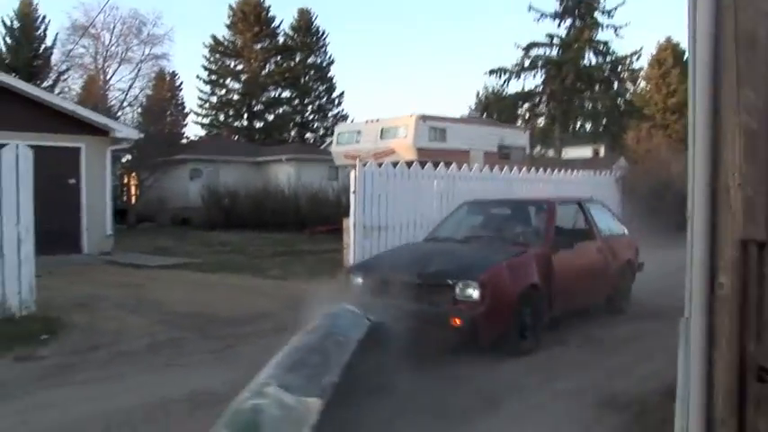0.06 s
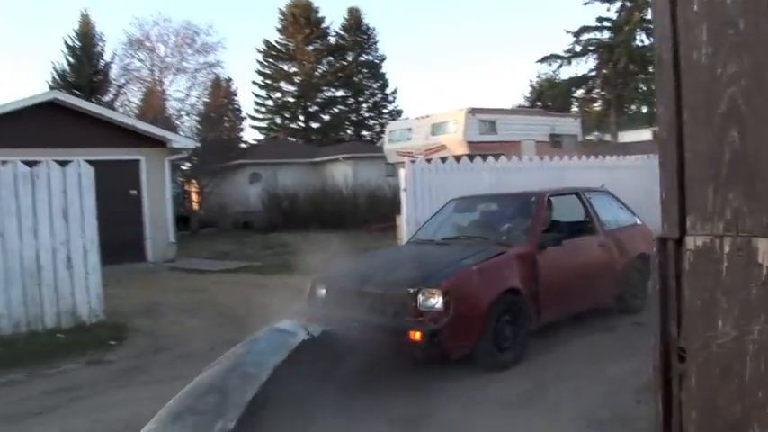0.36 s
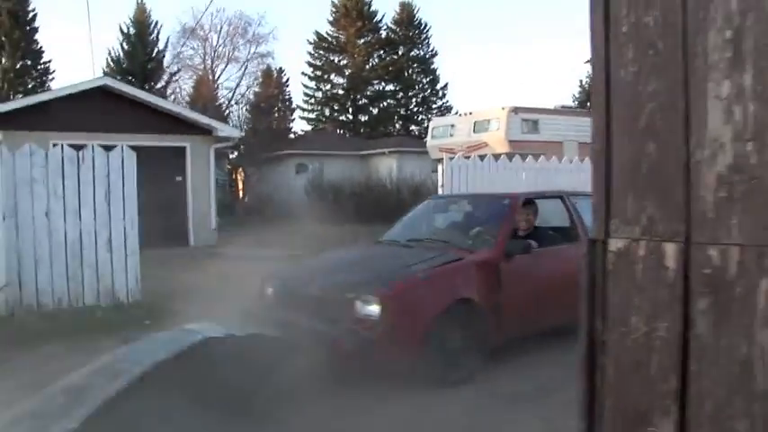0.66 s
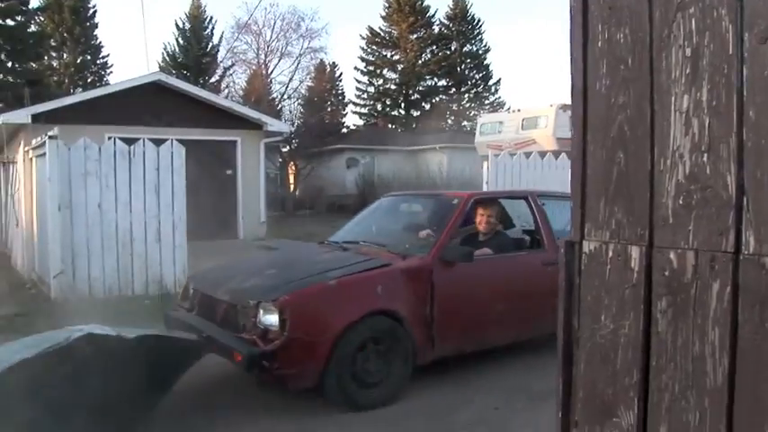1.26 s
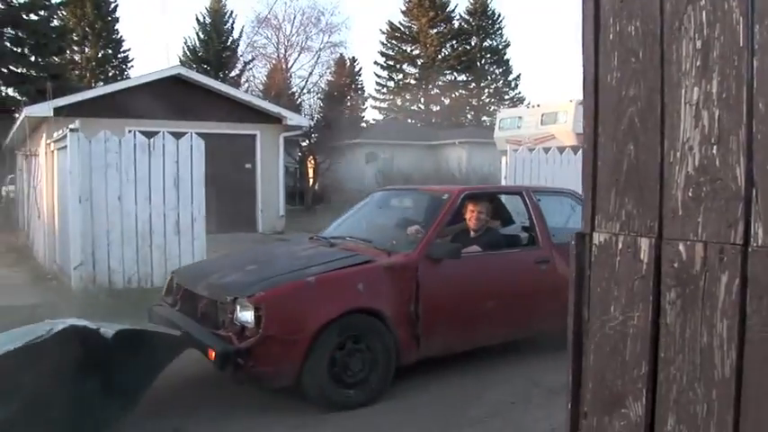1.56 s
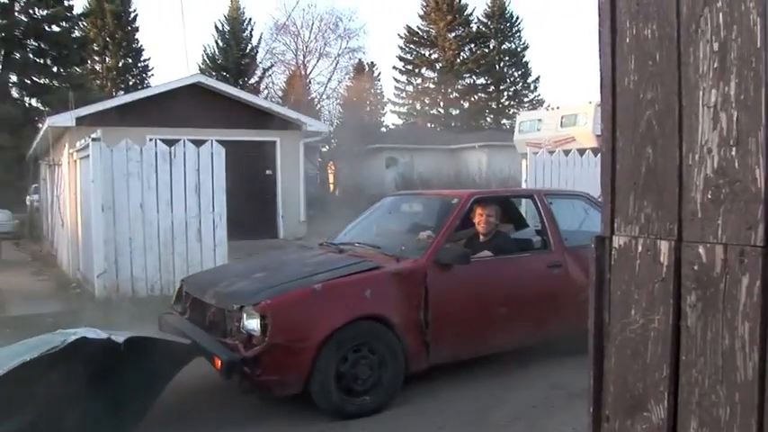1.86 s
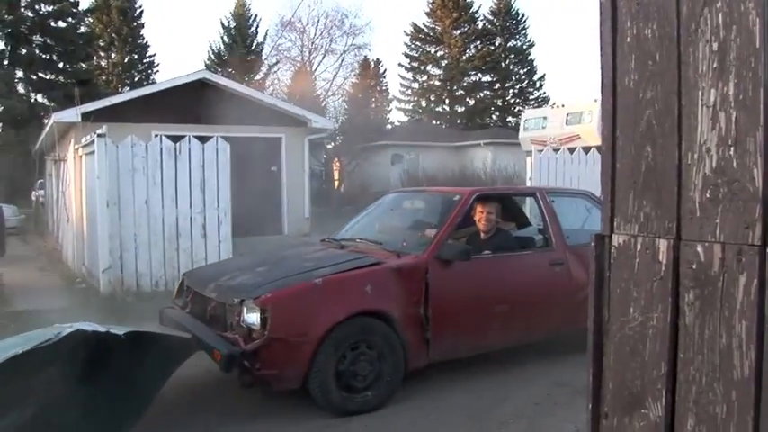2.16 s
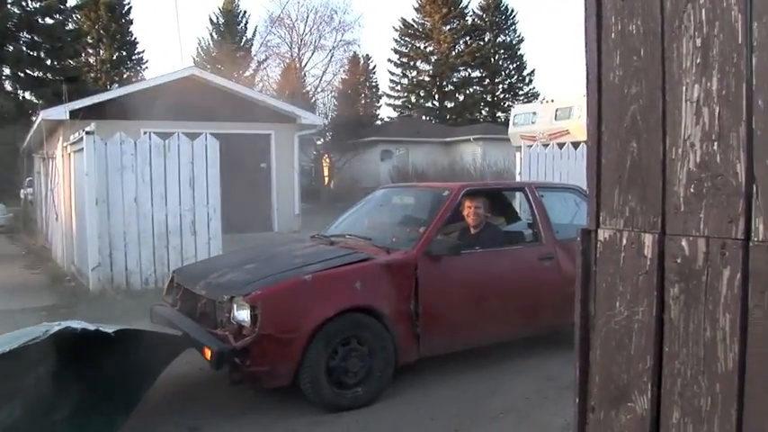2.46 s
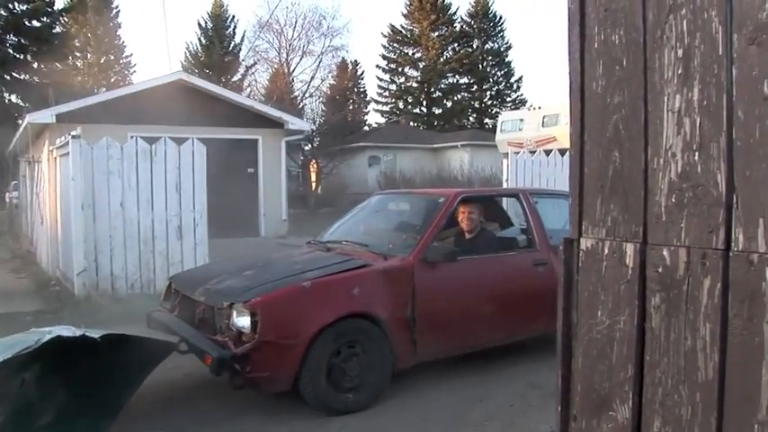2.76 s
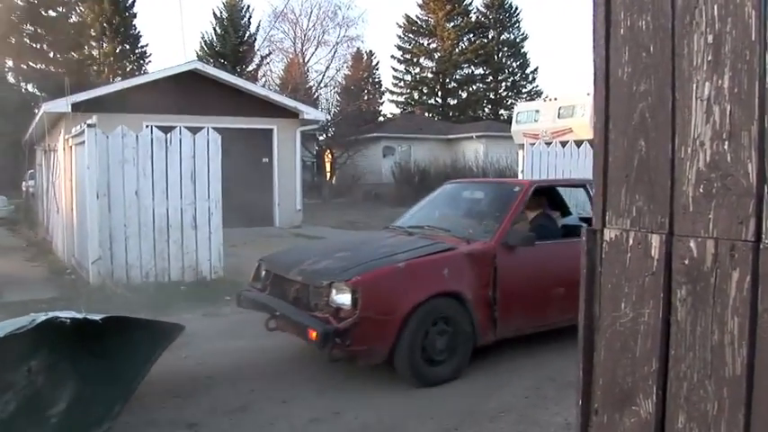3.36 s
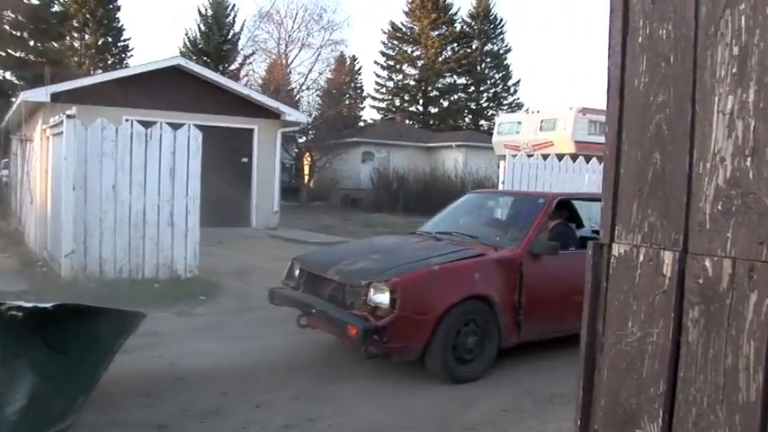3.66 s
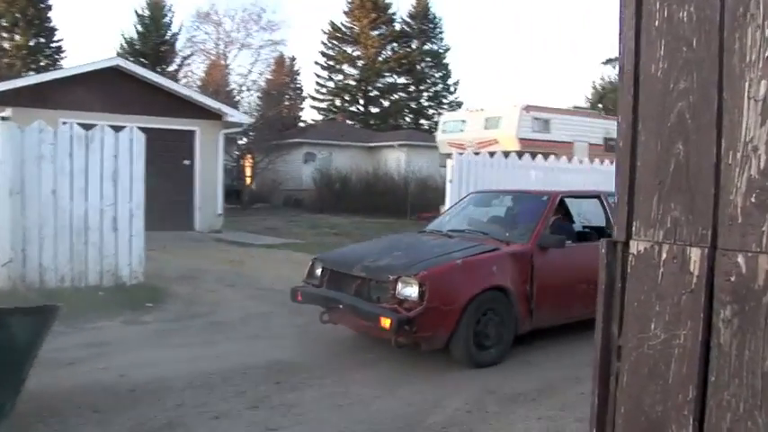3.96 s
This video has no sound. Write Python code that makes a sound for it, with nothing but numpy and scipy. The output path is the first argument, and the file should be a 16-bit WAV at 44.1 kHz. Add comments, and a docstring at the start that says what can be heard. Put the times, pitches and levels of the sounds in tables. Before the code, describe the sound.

A canoe scrapes loudly over gravel a few metres away, slightly left, with crunching, cracking stones and a hollow boom from the hull. After 1 second the scraping turns weaker and jerky, with brief groans, stopping around 2 seconds. A small car engine idles quietly, then revs at about 2.4 seconds with a low, thumping exhaust and light clatter. It sags near 3.3 seconds, picking up slightly while reversing.

```python
"""Gravel crunches and cracks under a booming hull: a small car shoves an upturned canoe along an alley.
The hull sticks and slips, crushing stones that make its shell ring; then it stops and settles.
The engine, whose firings thump the exhaust, idles, is revved, and sags as the clutch bites and backs
the car away. Heard from a few metres through a small stereo microphone."""
import sys
import numpy as np
from scipy import signal
from scipy.fft import rfft, irfft, next_fast_len
from scipy.io import wavfile
from scipy.ndimage import uniform_filter1d

SR = 44100
rng = np.random.default_rng(int(sys.argv[2]) if len(sys.argv) > 2 else 0)


def dump_mix(stems):
    """Bounce the given channels to the path in sys.argv[1] as a 16-bit WAV at rate SR."""
    frames = np.atleast_2d(stems).T  # one column per channel
    limited = np.clip(frames, -1, 1)  # hard clip at full scale
    pcm = np.round(limited * 32767).astype(np.int16)
    wavfile.write(sys.argv[1], SR, pcm)


N = 176400
T = np.arange(N) / SR

# tone of crunching stones: pitch_hz, level_db
CRUNCH_TONE = [(150,-34),(300,1),(420,2),(540,0.5),(740,-0.5),(1000,-0.5),(1210,0),(1500,-1.5),(2000,0),(2480,4.5),(2850,3),(3080,0.5),(3350,-4.5),(4300,-13.5),(4900,-12.5),(5800,-25),(8500,-34),(15500,-30.5)]
# deep tone of the hull, also used for the engine's burble: pitch_hz, level_db
BOOM_TONE = [(25,-57),(55,-23.5),(85,-9),(135,1),(175,-3),(230,-7),(300,-16),(600,-22.5),(2000,-70.5)]
# bright tone of sand and stone chips: pitch_hz, level_db
GRIT_TONE = [(1000,8),(4000,7),(8500,-0.5),(11000,5),(15500,3.5)]


def from_db(db):
    """Turn decibels into a gain."""
    return 10 ** (np.asarray(db) / 20)


def rms_one(x):
    """Scale a sound to an average power of 1."""
    return x / np.sqrt(np.mean(x ** 2) + 1e-20)


def in_time(rows):
    """Draw straight lines between a table's rows: one curve per column after the time."""
    times, *columns = np.transpose(rows)
    return [np.interp(T, times, column) for column in columns]


def colour(x, tone):
    """Filter a sound to follow a tone table, ringing only after each hit (minimum phase)."""
    size = 2 * next_fast_len(N // 2 + SR // 4)
    hz, db = np.transpose(tone)
    grid_hz = np.maximum(np.arange(size // 2 + 1) * SR / size, 1)
    gains = from_db(np.interp(np.log(grid_hz), np.log(hz), db))
    cepstrum = irfft(np.log(gains))
    cepstrum[1:size // 2] *= 2
    cepstrum[size // 2 + 1:] = 0
    return irfft(rfft(x, size) * np.exp(rfft(cepstrum)))[:N]


def drift(rate_hz):
    """A smooth random wander, typically about 1 either side of zero."""
    r = np.exp(-80 * np.pi * rate_hz / SR)
    slow = signal.lfilter([1], [1, -2 * r, r * r], rng.standard_normal(N // 40 + 2002))[2000:]
    return np.interp(np.arange(N) / 40, np.arange(len(slow)), rms_one(slow))


def steady(x, window=5000):
    """Even out slow swings in loudness, holding the power near 1."""
    power = uniform_filter1d(uniform_filter1d(x ** 2, window), window)
    return x / np.sqrt(np.maximum(power, 1e-20))


def grains(per_s, spread_db):
    """Random clicks, many small and a few large."""
    sizes = from_db(spread_db * np.minimum(rng.exponential(1, N), 5))
    return sizes * rng.choice([-1, 1], N) * (rng.random(N) < per_s / SR)


def ring(x, hz, widths_hz):
    """Make a sound ring at one pitch, with one filter for each width."""
    for width_hz in widths_hz:
        r = np.exp(-np.pi * width_hz / SR)
        x = signal.lfilter([1, 0, -1], [1, -2 * r * np.cos(2 * np.pi * hz / SR), r * r], x)
    return x


def hull_scrape():
    """The hull sticks and slips, crushing grains that ring patches of the shell and shake all of it."""
    # crunch of the hull dragging over gravel: time_s, level_db
    drag = [(0.0,-21),(0.04,-15.5),(0.30,-17),(0.44,-19.5),(0.48,-16.5),(0.725,-19.5),(0.77,-17),(0.89,-23),(0.98,-16.5),(1.12,-27.5),(1.31,-22),(1.385,-26.5),(1.46,-20),(1.50,-23),(1.60,-23.5),(1.7,-32.5),(1.75,-21.5),(1.81,-34.5),(1.87,-28.5),(1.95,-57.5)]
    # boom of the juddering hull: time_s, level_db
    judder = [(0.0, -25), (0.16, -24.5), (0.24, -15.5), (0.32, -21), (1.24, -28), (1.28, -38.5),
              (1.39, -24.5), (1.63, -27.5), (2.0, -50)]
    # hiss of sand being sprayed and crushed: time_s, level_db
    spray = [(0,-41),(.99,-40.5),(1.13,-48),(1.59,-41),(1.72,-48),(1.775,-40),(1.8,-54),(1.85,-51),(1.96,-74),(2.08,-59),(2.2,-90)]
    slips = from_db(1.5 * drift(rate_hz=47))
    contacts = grains(per_s=9000, spread_db=3) * slips
    patches, below = 0, 0
    for hz in np.geomspace(350, 5000, 16):  # each band swells and fades on its own
        low = signal.sosfiltfilt(signal.butter(10, hz, fs=SR, output="sos"), contacts)
        patches += (low - below) * from_db(3.5 * drift(rate_hz=9.9))
        below = low
    crunch = steady(colour(patches + contacts - below, CRUNCH_TONE), window=2400)
    crunch *= from_db(in_time(drag)[0] - 1) * np.interp(T, [1.9, 2.05], [1, 0])
    boom = steady(colour(grains(per_s=1500, spread_db=2.26) * slips, BOOM_TONE), window=3500)
    boom *= from_db(in_time(judder)[0] + 1) * np.interp(T, [1.75, 1.92], [1, 0])
    sand = steady(colour(grains(per_s=14000, spread_db=1.5) * slips, GRIT_TONE), window=2400)
    sand *= from_db(in_time(spray)[0] + 4)
    return crunch + boom + sand


def exhaust(pulses, boom_db):
    """Each firing pushes a low thump out of the exhaust."""
    # tone of the exhaust: pitch_hz, level_db
    tone = [(25,-39.5),(44,-12.5),(54,-11),(65,-2.5),(88,-0.5),(110,2.5),(132,5),(165,-9.5),(215,-21.5),(262,-35),(305,-17),(360,-32),(445,-21),(540,-30),(900,-44.5),(3000,-65.5)]
    return -steady(colour(pulses, tone)) * from_db(boom_db - 0.5)


def pipe_ring(firings, pipe_db):
    """Firings of uneven strength ring the exhaust pipe."""
    uneven = firings * from_db(1.5 * rng.standard_normal(N))
    return steady(ring(uneven, hz=200, widths_hz=(41, 90))) * from_db(pipe_db - 2.5)


def panel_growl(pulses, throb, boom_db):
    """The firings ring a body panel, which partly follows the exhaust's loudness."""
    shaking = pulses + 0.012 * rng.standard_normal(N) * (1 + throb)
    return steady(ring(shaking, hz=441, widths_hz=(48, 260))) * from_db(0.72 * boom_db - 31)


def fan(firing_count, firing_hz):
    """The fan hums where its housing rings; the octave above whines as it passes a second resonance."""
    blades_per_firing = 8
    phase = 2 * np.pi * blades_per_firing * firing_count
    blade_hz = blades_per_firing * firing_hz
    hum = np.sin(phase) * from_db(-42 + drift(rate_hz=5.1))
    hum /= np.hypot(1, (blade_hz - 217) / 12)  # loudest at 217 Hz
    whine = np.sin(2 * phase) * from_db(-50.5)
    whine /= np.hypot(1, (2 * blade_hz - 853) / 21)
    return np.sqrt(2) * (hum + whine)


def burble(boom_db):
    """A low rumble that swells when the engine burns roughly, as the throttle opens or the load changes."""
    # moments of rough burning: peak_s, level_db
    stumbles = [(2.43,-26.5),(3.22,-31.5),(3.67,-27)]
    swells = sum(from_db(db) * np.exp(-((T - peak_s) / .055) ** 2) for peak_s, db in stumbles)
    return steady(colour(rng.standard_normal(N), BOOM_TONE)) * (swells + from_db(boom_db - 22))


def clatter(firing_count, throb, clatter_db):
    """Valves tick twice per firing, and the engine bay hisses in step with the firings."""
    # tone of the engine bay: pitch_hz, level_db
    tone = [(150,-4),(300,-0.5),(450,5),(700,-4),(950,-5),(1130,1),(1300,-6),(1480,-3),(1700,-8.5),(2000,-3.5),(2400,2.5),(3100,-2),(3500,-6),(4300,-12),(5000,-14.5),(6000,-23),(8500,-30.5),(15500,-29)]
    ticks = np.diff(np.floor(2 * firing_count), prepend=0) * from_db(3.2 * rng.standard_normal(N))
    hiss = grains(per_s=12000, spread_db=2.85) * from_db(0.83 * drift(rate_hz=25))
    hiss *= 1 + 0.15 * throb
    rattle = rms_one(hiss) + from_db(-12.5) * rms_one(ticks)
    return steady(colour(rattle, tone)) * from_db(clatter_db + 3.5)


def engine():
    """The engine idles, revs and sags; its firings set the pace for its parts."""
    # engine speed: time_s, firings_per_s
    speed = [(0,44),(1.2,35),(1.8,29.8),(2.24,27.6),(2.32,30.2),(2.4,40.6),(2.5,62.4),(2.58,63.6),(2.7,58.7),(2.78,63.6),(2.92,68.4),(3.02,64.2),(3.12,60.6),(3.26,49.3),(3.4,44.3),(3.53,45),(3.63,47.2),(3.73,52.4),(3.84,55),(4,53)]
    # loudness of the parts as the load changes: time_s, boom_db, pipe_db, clatter_db
    load = [(0,-44.5,-29.5,-29.5),(1.9,-38.5,-45,-46),(2.25,-38.5,-52,-51),(2.34,-30,-41,-43.5),(2.42,-15.5,-23,-39.5),(2.47,-18,-25.5,-37.5),(2.56,-18.5,-24.5,-41),(2.69,-28,-26.5,-40),(2.79,-16.5,-21,-37.5),(2.88,-17,-29,-37.5),(3.0,-22,-27.5,-40),(3.1,-23.5,-24.5,-42),(3.18,-28.5,-29,-42.5),(3.33,-26.5,-24,-41),(3.45,-22.5,-24.5,-41),(3.56,-17.5,-26,-42.5),(3.66,-23.5,-21.5,-39),(3.8,-19.5,-38.5,-39.5),(4,-21.5,-35,-37.5)]
    firing_hz, = in_time(speed)
    boom_db, pipe_db, clatter_db = in_time(load)
    firing_count = np.cumsum(firing_hz * (1 + .003 * drift(rate_hz=20))) / SR
    firings = np.diff(np.floor(firing_count), prepend=0)  # one click per firing
    throb = np.cos(2 * np.pi * firing_count)
    pulses = firings * from_db(.6 * rng.standard_normal(N))
    pulses = signal.sosfilt(signal.butter(2, 20, "high", fs=SR, output="sos"), pulses)
    return (exhaust(pulses, boom_db) + pipe_ring(firings, pipe_db) + panel_growl(pulses, throb, boom_db)
            + fan(firing_count, firing_hz) + burble(boom_db) + clatter(firing_count, throb, clatter_db))


def outdoor_air():
    """A faint, steady background rumble."""
    # tone of the background: pitch_hz, level_db
    tone = [(25,-10.5),(90,7),(300,-15),(2000,-23),(15000,-45)]
    return from_db(-39.5) * rms_one(colour(rng.standard_normal(N), tone))


def stone_cracks():
    """A stone gives way: a sharp click and a brief crumbling, heard through the shell."""
    # stones breaking: start_s, strength_db, brightness_db
    cracks = [(.123,-4,-8),(.15,-1,-10),(.206,-3,-8),(.457,-5,-3),(.529,-2,-8),(.558,-1,-10),(.635,-5,-6),(.667,1.5,-14),(.748,-6,-6),(.764,-3.5,-4),(.811,3,-18),(.836,0,-10),(.957,-6,0),(1.001,-5,-4),(1.31,-12,2),(1.403,-10.5,16),(1.472,-7,-2),(1.577,-16,15),(1.619,-11,2),(1.685,-12,-1),(1.702,-18,13),(1.742,-4,5),(1.766,-8,17),(1.838,-15,10),(2.012,-44,29),(2.073,-20.5,0),(2.113,-22.5,0),(3.475,-19,-6)]
    rise_s, decay_s = .001, .0055
    shell, chips = np.zeros(N), np.zeros(N)
    age = T[:SR // 10]
    crumble = from_db(-9) * np.exp(-age / decay_s) * (1 - np.exp(-age / rise_s))
    for start_s, strength_db, brightness_db in cracks:
        burst = rng.standard_normal(len(age)) * crumble
        burst[int(rise_s * SR)] += 1  # the click
        span = slice(int(start_s * SR), int(start_s * SR) + len(age))
        shell[span] += burst * from_db(strength_db + 9)
        chips[span] += burst * from_db(strength_db + brightness_db - 24)
    return colour(shell, CRUNCH_TONE) + colour(chips, GRIT_TONE)


def groans():
    """The shell or a trapped stone catches on the gravel and rings briefly at one pitch."""
    # groans of the shell and squeals of stones: peak_s, pitch_hz, level_db
    catches = [(0.136,2580,-14),(1.001,2860,-18.5),(1.402,432,-21.5),(1.558,736,-21.5),(1.561,990,-26),(1.62,2720,-29),(3.41,2420,-38.5)]
    sound = np.zeros(N)
    for peak_s, pitch_hz, level_db in catches:
        ringing = ring(rng.standard_normal(N), pitch_hz, widths_hz=(98, 196))
        swell = np.exp(-((T - peak_s) / 0.0089) ** 2 / 2)
        sound += steady(ringing, window=1500) * from_db(level_db) * swell
    return sound


def tyre_pops():
    """Small stones pop under the tyres once the car rolls back."""
    pops = rms_one(colour(grains(per_s=90, spread_db=6.7), CRUNCH_TONE))
    rolling = np.interp(T, [3.5, 4], [0, 1])
    return pops * from_db(-57) * rolling


def reflections(x, decay_s):
    """Short echoes from ground and fences; five sets fade in and out as car and canoe move."""
    weights = np.array([drift(rate_hz=3.8) for _ in range(5)])
    weights /= np.linalg.norm(weights, axis=0)
    age = T[:SR // 8]
    echoes = np.zeros(N)
    for weight in weights:
        tail = rng.standard_normal(len(age)) * np.exp(-age / decay_s)
        spectrum = rfft(tail, 2 * len(age))
        even_tail = irfft(spectrum / np.abs(spectrum))[:len(age)]  # favours no pitch
        echoes += weight * signal.fftconvolve(x, even_tail)[:N]
    return echoes


def scene():
    """Canoe and car a little to the left, the alley spreading their sound."""
    # how much the echoes differ between left and right: pitch_hz, level_db
    width = [(60,-51),(150,-35),(300,-14.5),(650,-7.5),(1500,-6.5),(2100,-16.5),(2600,-45.5),(2950,-57),(3400,-21),(4200,3),(5000,-6.5),(6000,9.5),(7200,-1),(8500,5.5),(11000,-4),(15000,-3.5)]
    # how much the direct sound leans left: pitch_hz, level_db
    left_lean = [(100,-45),(350,-16),(700,-9),(1100,-12.5),(1700,-5.5),(2400,-19),(5000,-41),(9000,-19.5),(15000,-7.5)]
    direct = hull_scrape() + stone_cracks() + groans() + engine() + tyre_pops() + outdoor_air()
    bright = signal.sosfilt(signal.butter(2, 400, "high", fs=SR, output="sos"), direct)
    mid = direct + from_db(-10.5) * reflections(bright, decay_s=0.011)
    side = colour(reflections(direct, decay_s=0.007), width) + colour(direct, left_lean)
    return np.array([mid + side, mid - side])


def record(dry):
    """The microphone rounds off peaks, its two sides oppose near 7 kHz, and the highest treble is cut."""
    # tone of what both sides share: pitch_hz, level_db
    shared_tone = [(4900,-0.5),(5600,0.5),(6250,-26),(7700,-40),(8400,-1),(10000,-1)]
    left, right = 1.3 * np.tanh(dry / 1.3)
    mid = colour((left + right) / 2, shared_tone)
    side = (left - right) / 2
    treble_cut = signal.ellip(12, .1, 90, 15850, fs=SR, output="sos")
    return signal.sosfilt(treble_cut, np.array([mid + side, mid - side]))


dry = scene()
out = record(dry)
dump_mix(out)
```